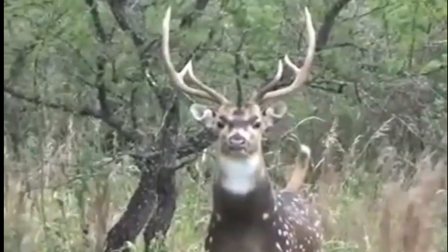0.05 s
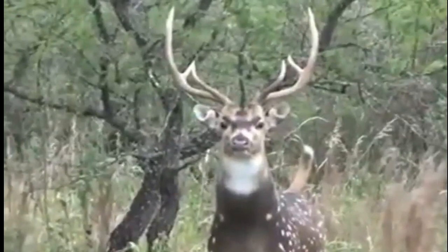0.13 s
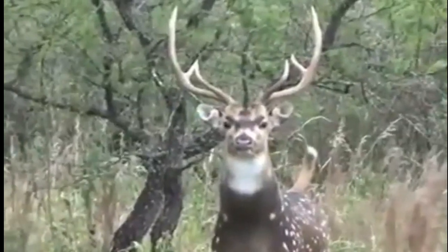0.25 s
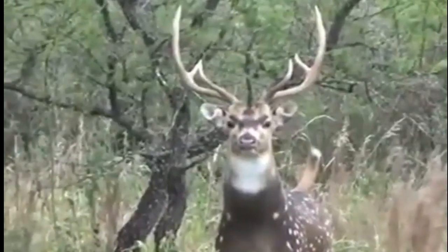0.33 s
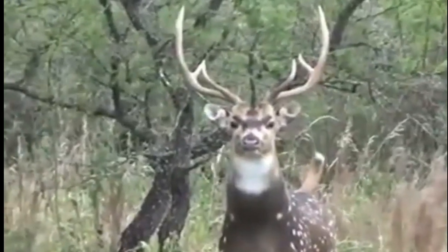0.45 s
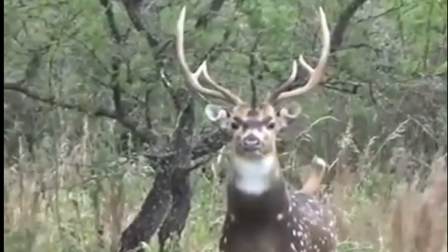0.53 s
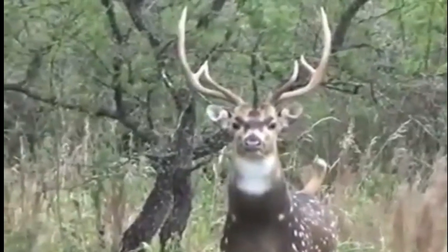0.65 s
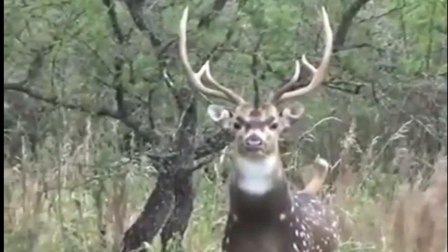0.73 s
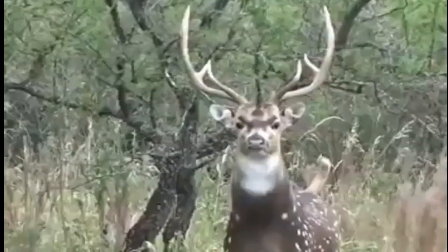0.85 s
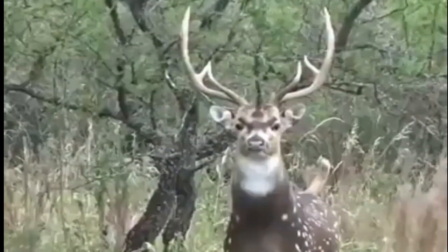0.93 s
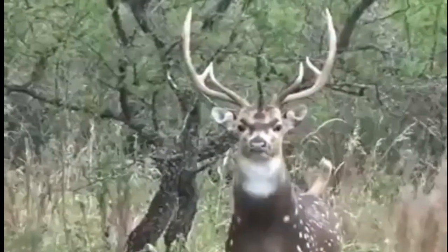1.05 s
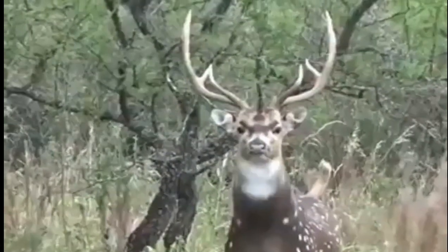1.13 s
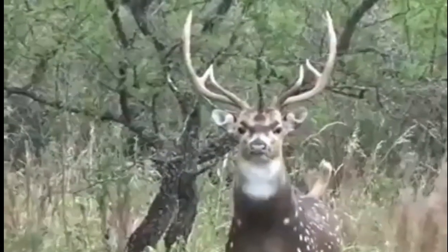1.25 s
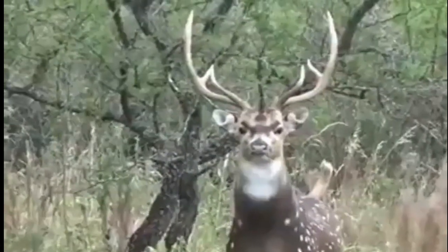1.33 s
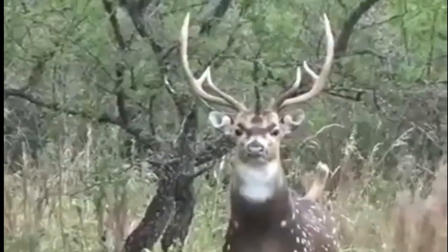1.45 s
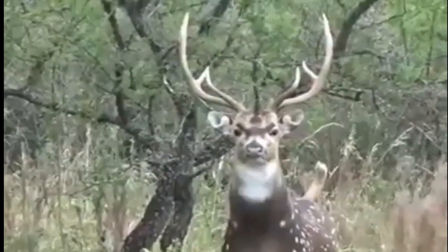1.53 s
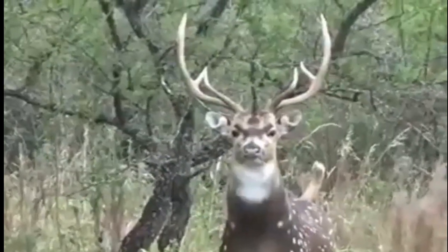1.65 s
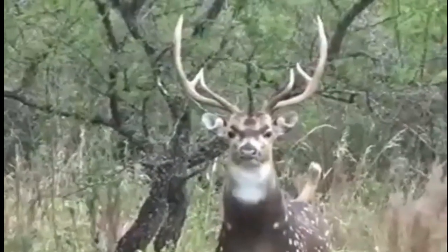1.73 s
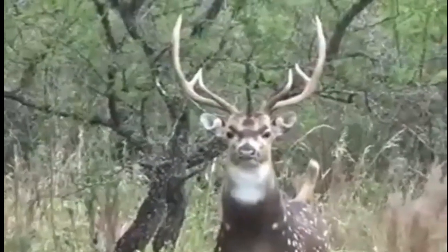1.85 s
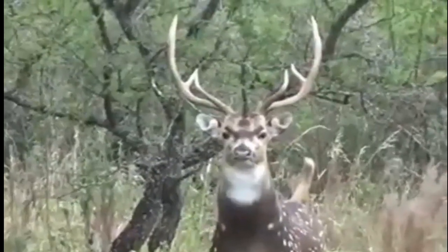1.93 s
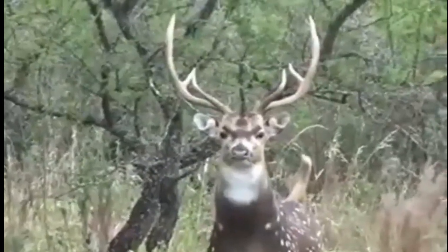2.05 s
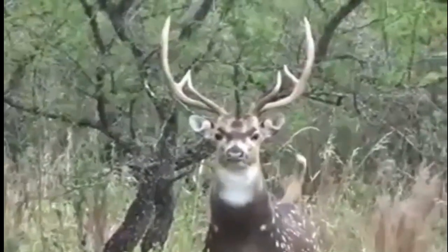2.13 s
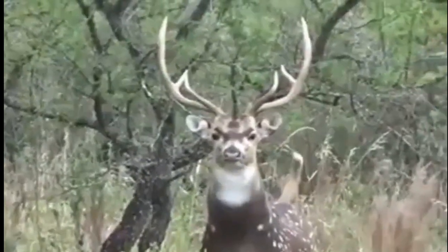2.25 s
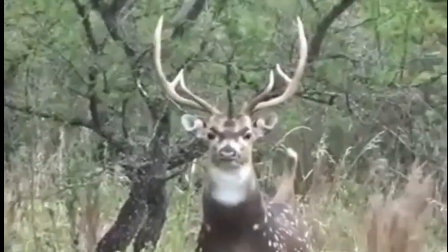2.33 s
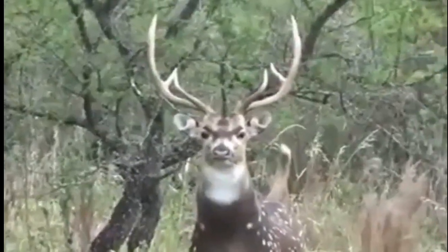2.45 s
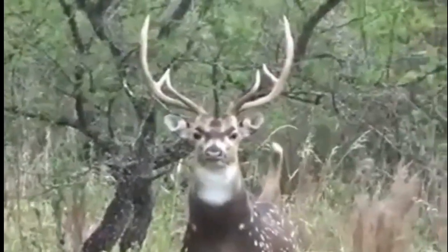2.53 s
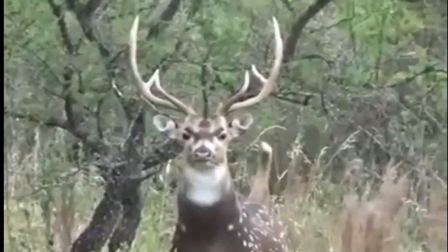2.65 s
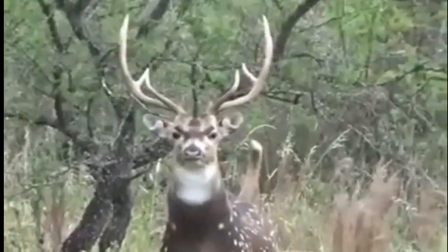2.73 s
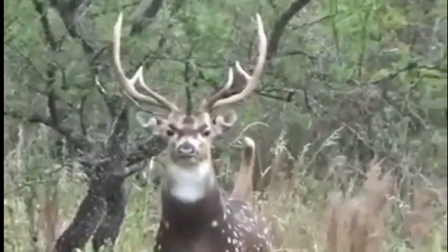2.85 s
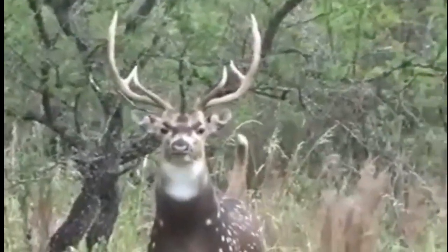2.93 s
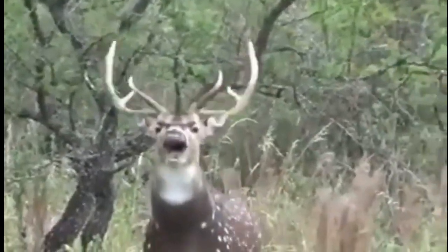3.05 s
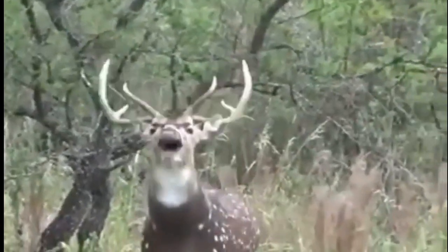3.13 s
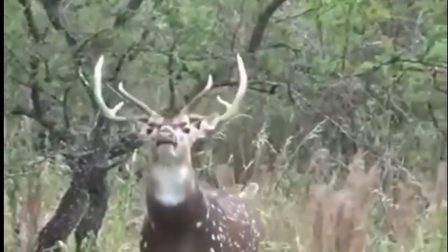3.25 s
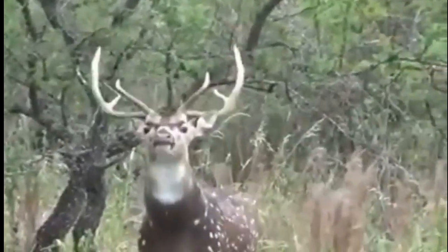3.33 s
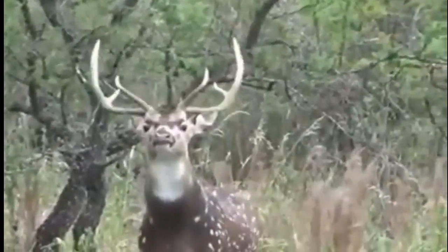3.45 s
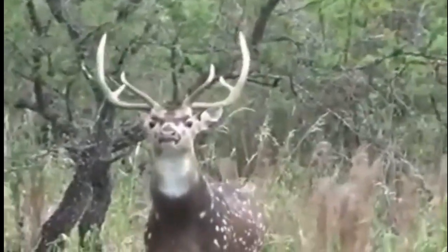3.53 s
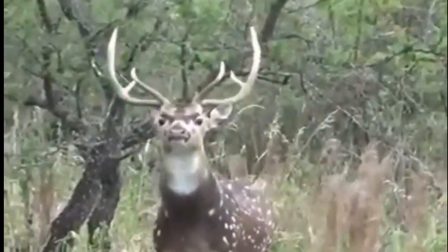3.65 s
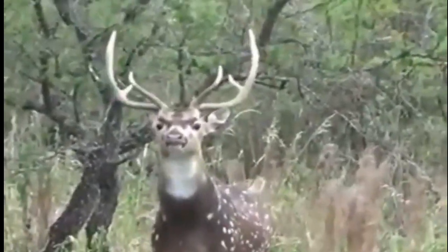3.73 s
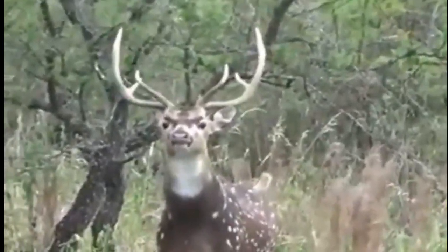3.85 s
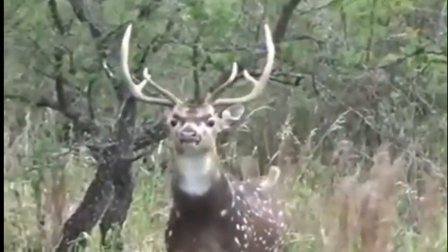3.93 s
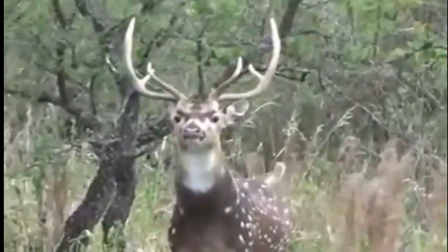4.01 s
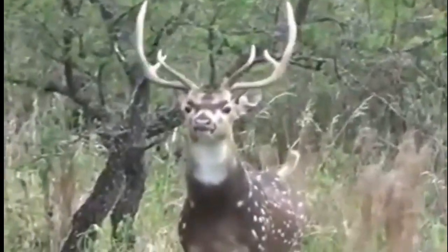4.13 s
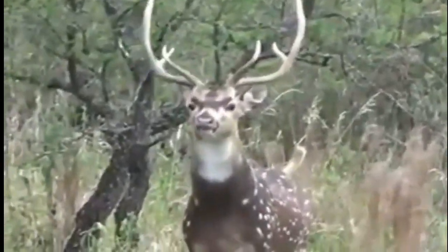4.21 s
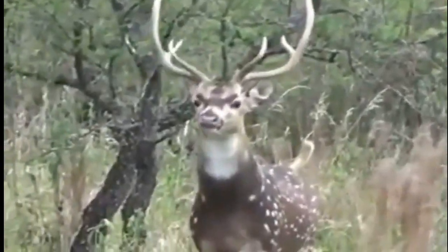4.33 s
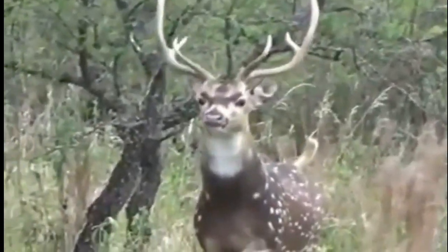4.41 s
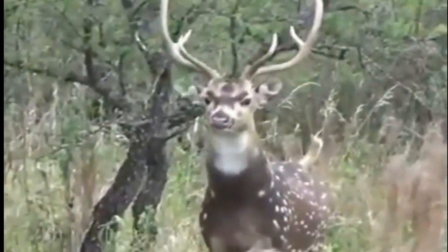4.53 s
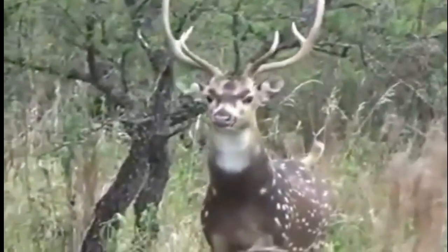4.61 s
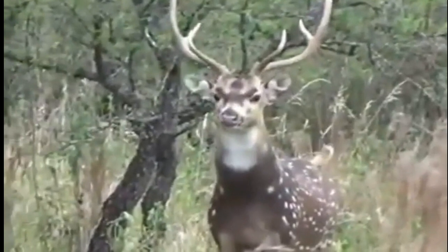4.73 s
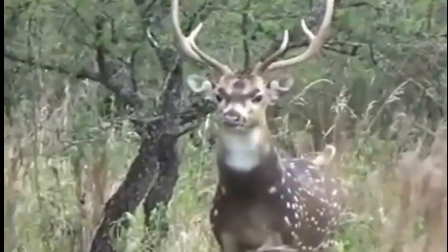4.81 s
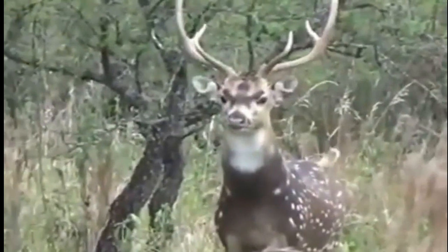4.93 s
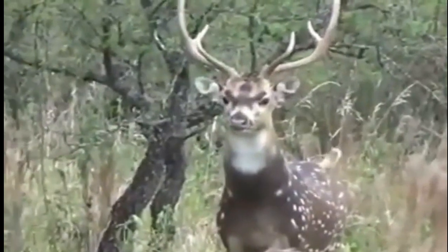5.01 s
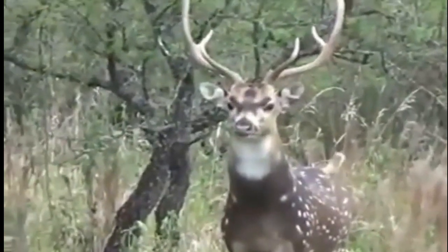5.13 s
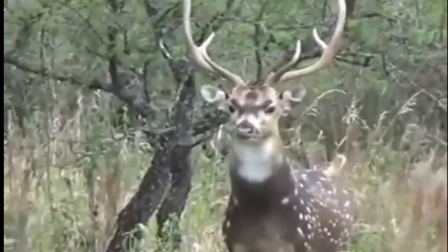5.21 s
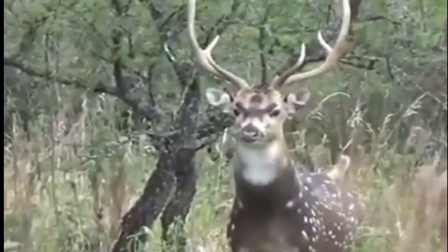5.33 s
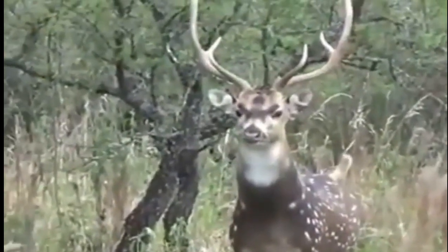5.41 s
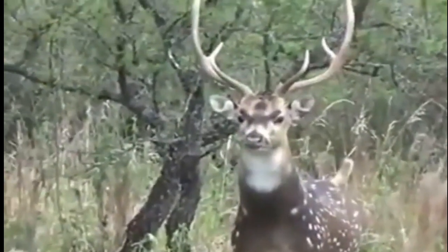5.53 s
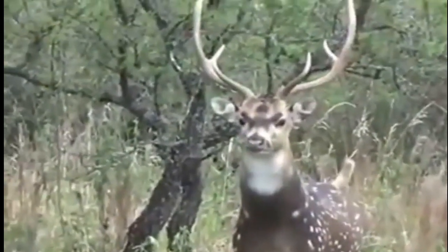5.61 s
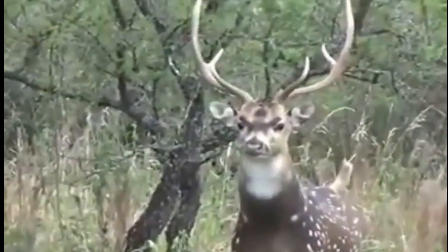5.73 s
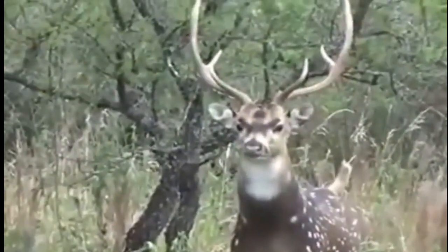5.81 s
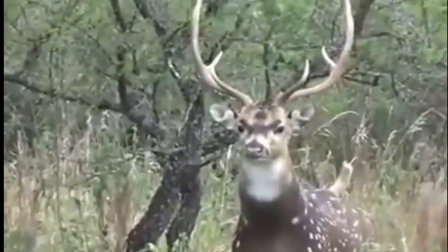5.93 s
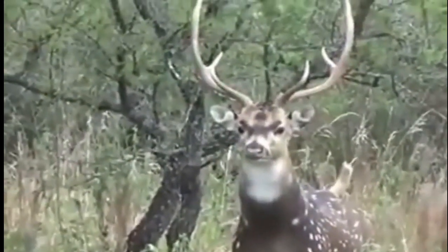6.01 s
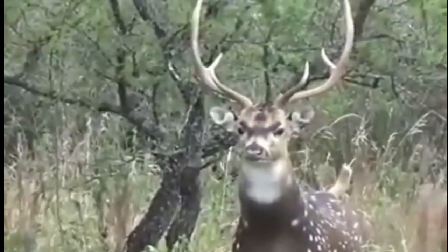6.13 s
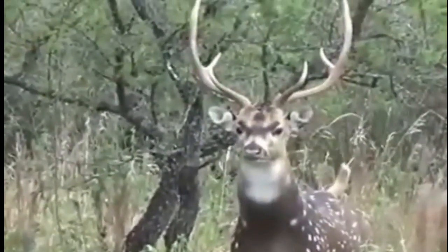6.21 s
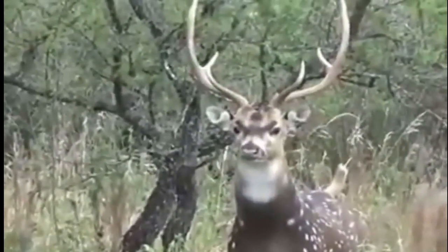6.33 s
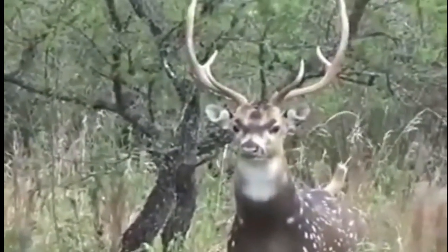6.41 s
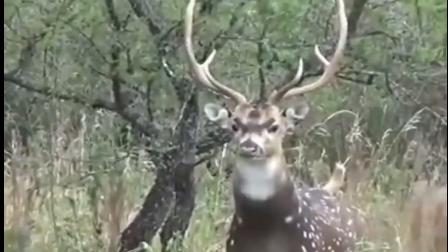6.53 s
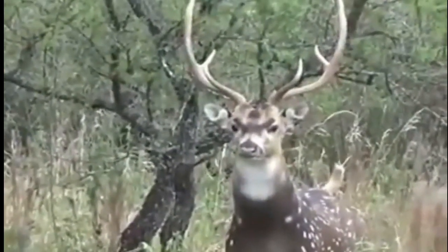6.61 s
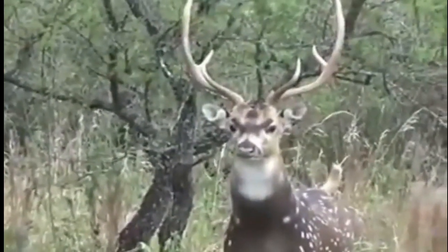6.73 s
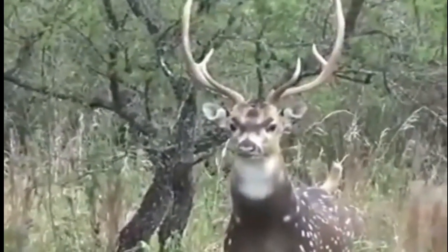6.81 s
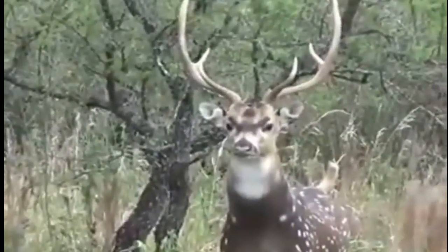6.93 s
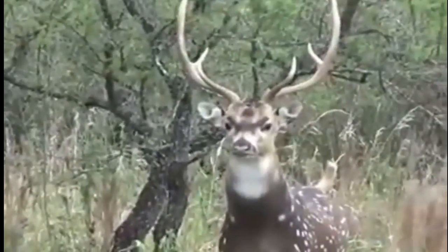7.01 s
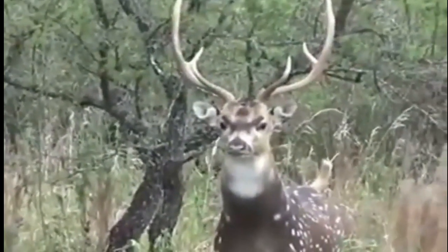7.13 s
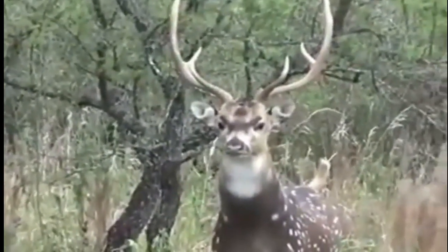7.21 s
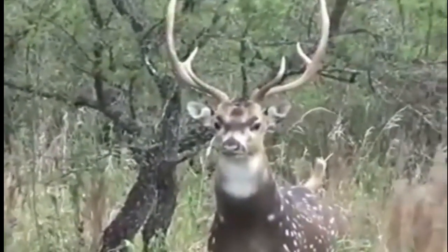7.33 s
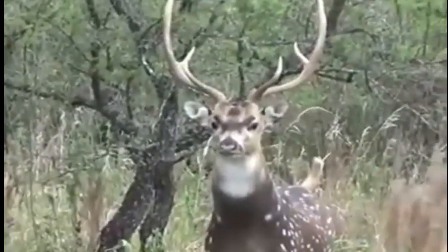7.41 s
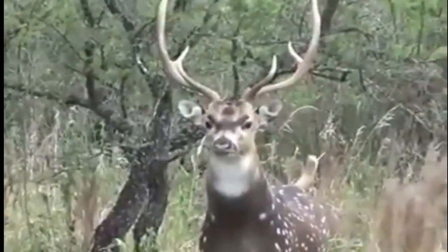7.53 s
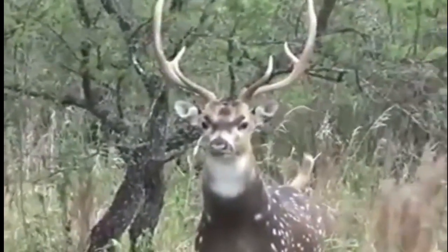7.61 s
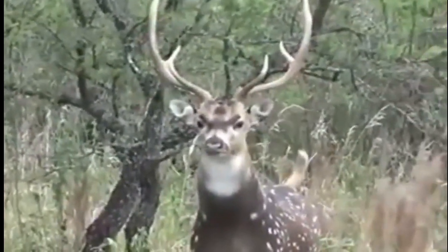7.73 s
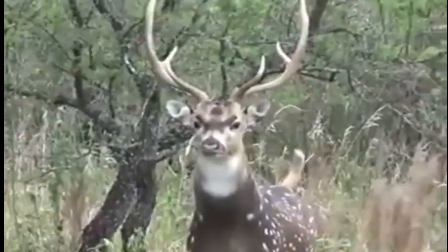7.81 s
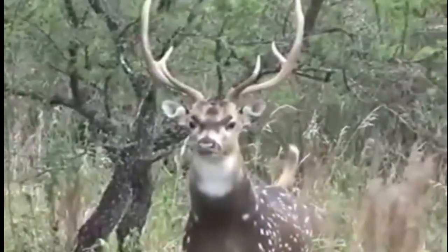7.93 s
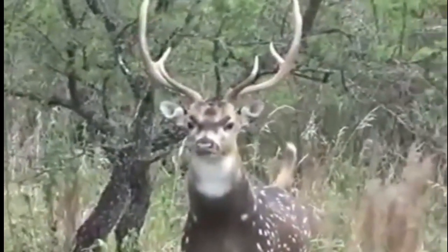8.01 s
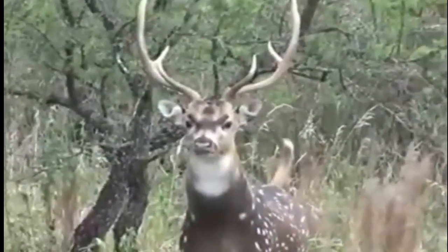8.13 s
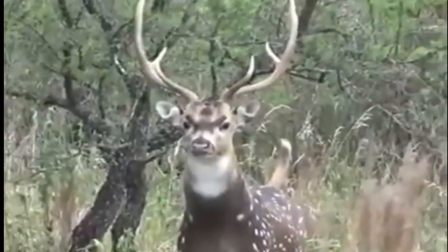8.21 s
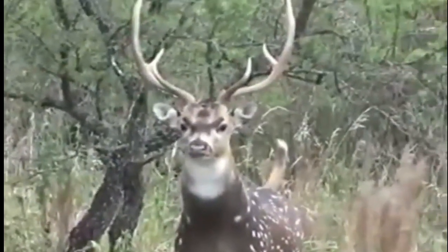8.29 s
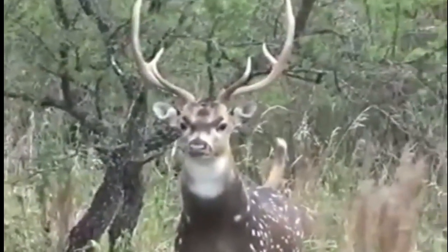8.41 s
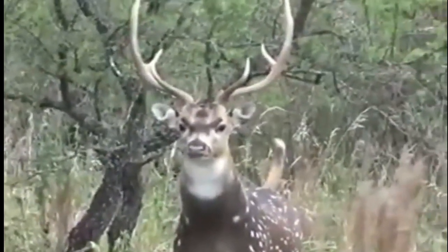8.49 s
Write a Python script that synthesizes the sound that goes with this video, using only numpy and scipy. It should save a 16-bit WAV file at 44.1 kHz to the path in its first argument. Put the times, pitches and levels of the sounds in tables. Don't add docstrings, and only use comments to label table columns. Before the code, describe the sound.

Deer give short, clean, high whistled barks at intervals, near and far, echoing through dry scrub over a steady pulsing cricket and faint birds.

```python
import sys
import numpy as np
from scipy import signal
from scipy.fft import rfft, irfft, next_fast_len
from scipy.io import wavfile
from scipy.ndimage import uniform_filter1d

SR = 44100
rng = np.random.default_rng(int(sys.argv[2]) if len(sys.argv) > 2 else 0)


def to_linear_factor(level_db):
    exponent = np.asarray(level_db, float) / 20
    return 10 ** exponent


def generate_wav(signal):
    frames = np.transpose(np.atleast_2d(signal))
    scaled = np.clip(frames, -1, 1) * 32767
    pcm = np.round(scaled).astype(np.int16)
    wavfile.write(sys.argv[1], SR, pcm)


N = 377496

# f/Hz, level/dB per Hz
AIR_COLOUR = [(25, -18), (60, -2.5), (240, -3.5), (660, -0.5), (950, -4.5), (1500, -10), (3300, -9.5),
              (4700, -14.5), (7000, -30), (7700, -21.5), (9500, -20), (11500, -21.5), (13500, -21.5)]
# f/Hz, likeness/0-1
AIR_LIKENESS = [(60, 0.98), (150, 1), (360, 0.063), (890, 0.28), (2200, 0.33), (5400, 0.95), (13300, 0.43)]
AIR_DB, AIR_TOP_HZ = -58, 13150
# t/s, level/dB
HUM_LEVEL = [(0, -71), (1.5, -68.5), (3, -71.5), (4.5, -76), (8.56, -78)]

# f/Hz, width/Hz, level/dB, throbs/per s, throb depth/dB
INSECT_BANDS = [
    (6363, 380, -59.5, 19, 1),
    (5437, 400, -61, 21, 0),
    (5590, 1500, -65, 18, 6.5),
    (6580, 460, -67.5, 15, -5.5),
]

# t/s, ring level/dB, ring f/Hz, crack level/dB, left over right/dB
TWIG_SNAPS = [(1.299, -52, 3530, -53, -10), (3.118, -42.5, 2570, -44, 1), (3.536, -33.5, 2470, -30.5, -4),
              (3.599, -45, 1512, -45, -8), (3.833, -41, 4200, -34, 4.5), (4.2998, -37, 802, -34.5, 4),
              (4.588, -31, 1820, -41, -4), (6.044, -31, 995, -34.5, 3), (8.24, -44, 4140, -57, -5),
              (1.138, -50.5, 2934, -53, 0), (5.708, -42, 2700, -48, 2), (2.872, -55, 3000, -56.5, -0.5)]

# t/s, length/s, turning f/Hz, drop to the end/Hz (negative dips), level/dB
ARCHED_WHISTLES = [(.53, 0.063, 3880, 898, -55.5), (4.103, 0.068, 3230, 31, -63),
                   (6.23, 0.028, 3690, 799, -60.5), (6.279, .06, 3190, 125, -56.5),
                   (6.428, 0.046, 3140, 205.5, -59), (6.514, .024, 3750, 798, -57.5),
                   (6.922, 0.051, 3730, 599.5, -61.5), (7.125, 0.031, 4415, 1200, -62),
                   (7.215, .085, 2537, -450, -65.5), (8.281, 0.066, 2480, -450, -66),
                   (8.336, 0.097, 3520, 898.5, -58), (6.832, .02, 3400, 899.5, -64),
                   (1.31, .022, 3700, 998, -61), (2.838, .02, 3290, 300.5, -63),
                   (4.036, .025, 3350, 100, -62)]
RISE_SHARE, TURN_SHARE, EDGE_DB = .7, 0.39, -4
# t/s, length/s, start f/Hz, end f/Hz, level/dB
STRAIGHT_WHISTLES = [(2.565, .035, 8850, 6870, -64), (7.44, .035, 4100, 3100, -67),
                     (7.83, .06, 4143, 2420, -65), (8.125, .045, 4450, 3020, -61),
                     (8.17, .04, 2980, 3430, -64), (.585, .035, 3050, 2550, -60),
                     (5.755, .035, 2050, 1600, -61), (5.995, .03, 1950, 1550, -61),
                     (8.25, .04, 4000, 2600, -65), (2.53, .03, 4600, 3900, -64),
                     (.14, .08, 1230, 1230, -62), (6.33, .025, 3000, 2400, -63), (0, .36, 430, 436, -63),
                     (3.62, .36, 374, 372, -66), (3.68, .3, 185, 182, -65), (8.08, .47, 460, 460, -69)]
# five t/s, their five f/Hz, level/dB
BENT_WHISTLES = [
    ((.258, .285, .315, .345, .362), (3150, 3800, 4050, 3800, 3030), -61),
    ((.755, .79, .85, .93, .97), (2700, 3000, 3140, 2960, 2750), -58.5),
    ((2.635, 2.65, 2.68, 2.705, 2.72), (2900, 3596, 3450, 3200, 2900), -64),
    ((2.998, 3.02, 3.045, 3.065, 3.08), (2900, 3350, 3400, 3100, 2500), -62),
    ((4.388, 4.398, 4.425, 4.465, 4.5), (3500, 2750, 2320, 2850, 3500), -62),
]
TRILL_S, TRILL_LENGTH_S, TRILL_DB = 6.572, .095, -56
TRILL_HZ, TRILL_SWING_HZ, TRILL_PER_S = 3280, 230, 75

# first t/s, last t/s
CRICKET_RUNS = [(.051, .51), (0.667, .949), (1.007, 1.299), (1.683, 2.707), (2.929, 3.318), (3.429, 3.596),
                (3.653, 4.397), (4.647, 5.211), (5.27, 5.503), (5.807, 6.495), (6.689, 7.204),
                (7.421, 7.763), (7.823, 8.229), (8.448, 8.506)]
LONE_PULSES = [0.013, 1.683, 3.596, 4.698, 7.146, 7.6475]
BEAT_S, PULSE_S, PAIR_S = .057, .0165, .0198
CRICKET_HZ, DROOP_HZ = 5722, 260
CRICKET_DB, BLUR_DB, CRICKET_LEFT_DB = -43.3, -35, 1.4

# f/Hz, time to fall 60 dB/s
ECHO_RING = [(500, 1.1), (850, 1.2), (1060, 2.0), (1500, 1.2), (1850, 1.2), (2150, 1.9), (4000, .7),
             (9000, .25)]
NEAR_DB, NEAR_T60 = 15, 0.43
# delay t/s, level/dB
EARLY_SLAPS = [
    (.017, -23.5),
    (.031, -28.5),
    (.052, -27),
]
# delay t/s, level/dB
SLOPE_RETURNS = [(.12, -30), (0.092, -28), (.2, -28.5), (.085, -28), (.2, -27), (.15, -22)]
ECHO_TILTS = [-0.5, -3, -4.5, -3, -2, -3.5]

# t/s, pitch f/Hz, effort level/dB, mouth opening (2nd harmonic over 1st)/dB
NEAR_BARKS = [
    [(1.651, 915, -52, -2.5), (1.67, 959.5, -27, 2), (1.68, 1006, -13, -4), (1.72, 1059, -14.5, -1.5),
     (1.78, 1082, -11, -3), (1.85, 1055, -13.5, -1), (1.895, 1002, -12, -5), (1.972, 774, -33, -2.5),
     (2.0, 649, -44, -35)],
    [(3.134, 824, -44, 2.5), (3.149, 937, -17.5, 8), (3.18, 1035, -13.5, -2), (3.22, 1045, -11.5, -5),
     (3.255, 1027, -10.5, -9.5), (3.29, 1023, -9.5, -10), (3.33, 912, -10.5, -4), (3.38, 679, -30, 2),
     (3.41, 523, -43.5, -21)],
    [(4.618, 860, -59.5, 5.5), (4.65, 973, -19, -9.5), (4.68, 1031, -9.5, -7.5), (4.72, 1075, -13, -3.5),
     (4.77, 1076, -13.5, -1), (4.83, 1048, -12.5, -4), (4.865, 962, -17.5, -5), (4.915, 770, -28, -3.5),
     (4.945, 623.4, -52, -10)],
]
FAR_BARKS = [
    [(0.482, 1206, -66, -17), (0.497, 1255, -47, -17), (0.56, 1284, -44.5, -19), (0.61, 1278, -45, -14),
     (0.65, 1209, -48, -24), (0.69, 1146, -55.5, -3), (0.72, 960, -58, -7), (0.74, 904, -81, -5)],
    [(5.447, 1147, -70, -2), (5.46, 1185, -34.5, -2), (5.478, 1210, -27.5, -10), (5.5, 1253, -31.5, -8.5),
     (5.555, 1246, -35, -3.5), (5.577, 1231, -36, -7), (5.6, 1138, -36.5, -10), (5.62, 1103, -67, 18.5)],
    [(7.485, 1021, -62, -16), (7.5, 1035, -32.5, -14), (7.53, 1040, -24.5, -12), (7.566, 999, -30, -12),
     (7.585, 980.3, -22, -7), (7.615, 938, -23.5, -9.5), (7.645, 882.7, -31.5, -14), (7.67, 771, -45, -0.5),
     (7.69, 683, -47, -7)],
]
# left over right/dB, echo level/dB, echo length/factor, unsteadiness/0-1, 2nd voice/dB
CALLERS = [
    (-0.5, -10.5, 0.73, 0.01, -61),
    (7, -21.5, 0.75, 0, -58),
    (1, -23, 0.73, 0, -59),
    (7, -21, 0.71, 0, -62),
    (2, -13, 0.88, 0.01, -3.5),
    (3, -16.5, 0.86, 0.01, -63),
]
# 3rd harmonic/dB, its loss/dB per 100 Hz under top pitch, breath/dB,
# 4th harmonic/dB, change for each higher harmonic/dB
VOICES = [(-40, 3, -21, -50, -5), (-27.5, 2.5, -30.5, -51.5, 1.5), (-32, 13, -21.5, -40.5, -3),
          (-26, 0.5, -31, -52, -2.5), (-16.5, 0, -22, -29, -4.5), (-21, 1, -24.5, -50, 4)]
MOUTH_HZ = [150, 400, 900, 1800, 3300, 5200, 6700, 8400, 10500, 13000]
MOUTHS = [(-32, -26.5, 5.5, 6.2, -3, -1, 15, -14, -13, -4),
          (3.5, -1.5, 6.1, 12, 4, 5.5, -4, 6, -11.5, -17.5), (-3, -7, 6.4, 2.4, 8.5, 0.5, -1, 5, 6.5, -8.5),
          (4, 2, 9.5, 8.9, 12, 2.5, -0.5, 5, -9, -17), (2.5, -10, 3, 7.5, 10, -17, 10, 7.5, -1.5, -14.5),
          (-4, -4, 14, 12, 21.5, -6.5, 1, -13, -12, -20)]
# harmonic number, start t/s, end t/s
SHINES = [(4, 1.68, 1.93), (5, 1.68, 1.72), (5, 1.765, 1.9), (7, 1.68, 1.81), (8, 1.68, 1.81),
          (9, 1.68, 1.725), (10, 1.725, 1.83), (8, 1.875, 1.925), (4, 3.138, 3.165), (4, 3.16, 3.27),
          (5, 3.15, 3.2), (5, 3.255, 3.345), (4, 4.645, 4.69), (4, 4.7, 4.86), (6, 4.645, 4.745),
          (7, 4.65, 4.77), (8, 4.665, 4.735), (9, 4.645, 4.69), (10, 4.7, 4.83), (12, 4.665, 4.73),
          (3, 3.14, 3.23), (3, 3.22, 3.308), (6, 3.16, 3.22)]
SHINE_LEVELS = [-34, -36, -30.5, -34, -33, -37, -41, -35, -19, -26.5, -33.5, -28, -31.5, -32, -27, -34.5,
                -33.5, -40, -47.5, -49.5, -17, -14, -36]
TOP_HARMONIC = 9
FLICKER_DB, UPPER_FADE_DB_PER_S = 1.5, 22.5
BREATH_LOSS_DB, END_SHAKE, END_SHIMMER_DB = 0, .003, 0.53
SECOND_HZ, SECOND_RISE_HZ_PER_S, SECOND_FROM_S = 83, 240, .039
JET_DB = 4

# start t/s, end t/s, start f/Hz, width/Hz, level/dB
RASPS = [(1.665, 1.695, 6600, 700, -43), (1.88, 1.967, 5580, 1190, -41), (3.15, 3.183, 7190, 900, -32),
         (4.639, 4.664, 6500, 1786, -37.5), (4.757, 4.84, 7940, 2500, -43), (4.809, 4.918, 5180, 600, -37),
         (1.8, 1.89, 8300, 2200, -44), (7.497, 7.582, 1800, 298, -39), (7.497, 7.572, 690, 236, -47),
         (0, 0.047, 7700, 600, -56)]
GASPS = [
    (5.605, 5.646, 1950, 130, -46.5),
    (5.605, 5.635, 1060, 150, -54),
]
# start t/s, end t/s, f/Hz, width/Hz,
# level/dB
HISSES = [(5.475, 5.495, 7350, 150, -56), (5.54, 5.585, 7220, 50, -56), (5.52, 5.59, 8530, 150, -55),
          (5.48, 5.61, 10000, 250, -58), (7.505, 7.625, 3350, 150, -39), (7.5, 7.63, 2880, 220, -44),
          (7.53, 7.62, 4900, 300, -57), (7.5, 7.6, 4050, 250, -53),
          (1.652, 1.678, 1650, 350, -38), (1.653, 1.675, 900, 150, -40.5), (1.685, 1.744, 500, 400, -47.5),
          (3.278, 3.297, 1600, 600, -33), (4.635, 4.66, 1400, 300, -48), (7.51, 7.559, 1500, 200, -48),
          (7.635, 7.69, 720, 150, -46), (5.5, 5.6, 1900, 300, -55)]
RASP_SAG, GASP_SAG, RASP_LEFT_DB = 0.064, 0.268, 1.5

BASS_MONO = .5


def evened(x):
    return x / np.sqrt(np.mean(x ** 2) + 1e-20)


def read(points, hz):
    f, value = np.transpose(points)
    return np.interp(np.log(hz + 1), np.log(f + 1), value)


def drift(count, size):
    return evened(uniform_filter1d(uniform_filter1d(rng.standard_normal(count), size), size))


def glide(s, hz):
    t = np.arange(s[0], s[-1], 1 / SR)
    k = np.clip(np.searchsorted(s, t, "right") - 1, 0, len(s) - 2)
    slope, step, rise = np.gradient(hz, s), np.diff(s)[k], np.diff(hz)[k]
    u = (t - s[k]) / step
    bend = (1 - u) * (slope[k] * step - rise) - u * (slope[k + 1] * step - rise)
    return t, np.interp(t, s, hz) + u * (1 - u) * bend


def swell(t, start, end):
    return np.sin(np.pi * np.clip((t - start) / (end - start), 0, 1)) ** 0.26


def add(mix, s, sound, pan_db=0):
    part = mix[:, max(round(s * SR), 0):][:, :np.shape(sound)[-1]]
    part += np.atleast_2d(sound)[:, :part.shape[1]] * to_linear_factor(np.array([[.5], [-.5]]) * pan_db)


def echoes(length=1, tilt_db=0):
    shape = (2, 3 * SR // 2)
    taps = rng.standard_normal(shape) * (rng.random(shape) < .05)
    taps += .5 * taps[::-1]
    hz, t, z = signal.stft(taps, SR, nperseg=256)
    t60 = read(ECHO_RING, hz)[:, None]
    slopes = to_linear_factor(-60 * t / length / t60)
    trunks = to_linear_factor(NEAR_DB - 60 * t / np.minimum(NEAR_T60, 1.1 * t60))
    decay = (slopes + trunks) * to_linear_factor(1.8 * drift(len(t), size=9)) * (1 - np.exp(-t / 0.004))
    decay *= to_linear_factor(tilt_db * np.log2(np.maximum(hz, 1000) / 1000))[:, None]
    tail = signal.istft(z * decay, SR, nperseg=256)[1]
    return tail / np.linalg.norm(tail[0])


def air():
    frames, hz = N // 256 + 5, np.fft.rfftfreq(1024, 1 / SR)
    a, b, c, d, patches = rng.standard_normal((frames, 513, 5)).T
    patches = evened(uniform_filter1d(uniform_filter1d(patches, 12, 0), 14, 1))
    same = np.clip(read(AIR_LIKENESS, hz), -1, 1)[:, None]
    left = a + 1j * b
    right = same * left + np.sqrt(1 - same ** 2) * (c + 1j * d)
    level_db = read(AIR_COLOUR, hz)[:, None] + 1.5 * patches + 0.45 * drift(frames, size=30)
    z = np.array([left, right]) * to_linear_factor(level_db) * (hz < AIR_TOP_HZ)[:, None]
    wash = to_linear_factor(AIR_DB) * evened(signal.istft(z, nperseg=1024, noverlap=768)[1][:, :N])
    t = np.arange(N) / SR
    hum = np.sin(2 * np.pi * 93 * t + .6 * drift(N, size=3000)) * (1 + .3 * drift(N, size=4000))
    return wash + to_linear_factor(np.interp(t, *np.transpose(HUM_LEVEL)) + 0.5) * hum


def chorus():
    size = next_fast_len(N)
    hz, out = np.fft.rfftfreq(size, 1 / SR), 0
    for centre_hz, width, db, rate, depth_db in INSECT_BANDS:
        noise = rng.standard_normal((2, N))
        shape = 1 / (1 + (2 * (hz - centre_hz) / width) ** 4)
        band = irfft(rfft(noise + 0.17 * noise[::-1], size) * shape, size)[:, :N]
        throb = np.cos(2 * np.pi * np.cumsum(rate * (1 + 0.036 * drift(N, size=20000))) / SR)
        out = out + to_linear_factor(db + depth_db * throb + 0.69 * drift(N, size=15000)) * evened(band)
    return out


def twigs():
    out, t = np.zeros((2, N)), np.arange(1500) / SR
    crack_filter = signal.butter(1, [800 / SR * 2, 3000 / SR * 2], "band")
    for s, ring_db, hz, crack_db, pan_db in TWIG_SNAPS:
        noise = rng.standard_normal((2, 1500))
        ring = np.sin(2 * np.pi * hz * t) * to_linear_factor(ring_db - 60 * t / 0.019)
        splinters = (noise + noise[::-1] / 2) * to_linear_factor(crack_db - 60 * t / 0.07)
        crack = signal.lfilter(*crack_filter, splinters)
        add(out, s, (ring + crack) * np.minimum(t / 0.0002, 1), pan_db)
    return out


def trill():
    t = np.arange(0, TRILL_LENGTH_S, 1 / SR)
    warble = np.sin(2 * np.pi * TRILL_PER_S * t) * (1 + 0.41 * drift(len(t), size=200))
    hz = TRILL_HZ + TRILL_SWING_HZ * warble
    return to_linear_factor(TRILL_DB) * np.sin(2 * np.pi * np.cumsum(hz) / SR) * np.hanning(len(t)) ** 0.11


def birds():
    out = np.zeros((2, N))
    arches = [(s, length, (hz - RISE_SHARE * drop, hz, hz - drop), db)
              for s, length, hz, drop, db in ARCHED_WHISTLES]
    slides = [(s, length, (a, a + TURN_SHARE * (b - a), b), db)
              for s, length, a, b, db in STRAIGHT_WHISTLES]
    notes = [(start + length * np.array([0, TURN_SHARE, 1]), hz, db)
             for start, length, hz, db in arches + slides]
    for s, hz, db in notes + BENT_WHISTLES:
        t, hz = glide(np.array(s), np.array(hz))
        shaky_hz = hz * (1 + 0.0063 * drift(len(t), size=100))
        husk = 1 + 0.35 * drift(len(t), size=160)
        tone = np.sin(2 * np.pi * np.cumsum(shaky_hz) / SR) * husk
        level = to_linear_factor(db + np.interp(t, [s[0], s[len(s) // 2], s[-1]], [EDGE_DB, 0, EDGE_DB]))
        add(out, s[0], np.sqrt(2) * level * tone * signal.windows.tukey(len(t), .15), 2.5)
    add(out, TRILL_S, trill(), 2.5)
    return out + to_linear_factor(-13.0) * signal.fftconvolve(out, echoes(), axes=1)[:, :N]


def pulse_pairs():
    beats = np.concatenate([np.linspace(a, b, round((b - a) / BEAT_S) + 1) for a, b in CRICKET_RUNS])
    return beats[abs(beats[:, None] - LONE_PULSES).min(axis=1) > BEAT_S / 4]


def cricket():
    out, u = np.zeros((2, N)), np.arange(round(PULSE_S * SR)) / (PULSE_S * SR)
    strokes = np.concatenate([pulse_pairs(), pulse_pairs() + PAIR_S, LONE_PULSES])
    for s, luck in zip(strokes, rng.standard_normal((len(strokes), 3))):
        hz = CRICKET_HZ + 15 * luck[0] - 1.6 * DROOP_HZ * abs(u - .35) ** 3.9
        phase = 2 * np.pi * (np.cumsum(hz) / SR + luck[1])
        stroke = np.sin(np.pi * u) ** 1.4 * (np.sin(phase) + to_linear_factor(-30) * np.sin(2 * phase))
        add(out, s - PULSE_S / 2, to_linear_factor(CRICKET_DB + 0.38 * luck[2]) * stroke, CRICKET_LEFT_DB)
    blur = rng.standard_normal((2, 2000)) * to_linear_factor(-60 * np.arange(2000) / SR / 0.11)
    return out + to_linear_factor(BLUR_DB) * signal.oaconvolve(out, blur, axes=1)[:, :N]


def rasp(start, end, start_hz, end_hz, width, db):
    t = np.arange(start, end, 1 / SR)
    noise = rng.standard_normal((2, 2, len(t)))
    noise = signal.lfilter(*signal.butter(2, width / SR), noise + .6 * noise[:, ::-1])
    turn = np.exp(2j * np.pi * np.cumsum(np.linspace(start_hz, end_hz, len(t))) / SR)
    return to_linear_factor(db) * swell(t, start, end) * evened(((noise[0] + 1j * noise[1]) * turn).real)


def hoarseness():
    out = np.zeros((2, N))
    for rows, sag in ((RASPS, RASP_SAG), (GASPS, GASP_SAG), (HISSES, 0)):
        for start, end, hz, width, db in rows:
            add(out, start, rasp(start, end, hz, hz * (1 - sag), width, db), RASP_LEFT_DB)
    return out + to_linear_factor(-16.0) * signal.fftconvolve(out, echoes(), axes=1)[:, :N]


def breath_puffs(turns, mouth):
    count = len(turns)
    own, shared = rng.standard_normal((2, count)), rng.standard_normal(count)
    puffs = (1 + 0.45 * np.cos(2 * np.pi * turns)) * (0.81 * own + 0.86 * shared)
    colour = read(mouth, np.fft.rfftfreq(count, 1 / SR))
    z = signal.stft(irfft(rfft(puffs) * to_linear_factor(colour), count), nperseg=256)[2]
    patches = uniform_filter1d(uniform_filter1d(rng.standard_normal(z.shape[1:]), 3, 0), 16, 1)
    bass_steady = np.minimum(np.arange(len(patches)) / 8, 1)[:, None]
    return signal.istft(z * to_linear_factor(JET_DB * evened(patches) * bass_steady), nperseg=256)[1][:, :count]


def bark(rows, mouth_db, voice_db, unsteady, second_db):
    s, hz, effort_db, open_db = np.transpose(rows)
    third_db, loss_db, breath_db, upper_db, tilt_db = voice_db
    mouth = list(zip(MOUTH_HZ, mouth_db))
    t, hz = glide(s, hz)
    count, age = len(t), t - s[0] - SECOND_FROM_S
    away = (hz.max() - hz) / 100
    loss = loss_db * away * (t > t[hz.argmax()])

    push_db = np.interp(t, s, effort_db)
    effort = to_linear_factor(push_db + END_SHIMMER_DB * away * drift(count, size=110))
    breath = to_linear_factor(push_db + breath_db - BREATH_LOSS_DB * away + 1.5 * drift(count, size=600))
    turns = np.cumsum(hz * (1 + (unsteady + END_SHAKE * away) * drift(count, size=90))) / SR
    second = to_linear_factor(second_db) * np.clip(age / .012 + .7, 0, 1)
    other = turns + (SECOND_HZ + SECOND_RISE_HZ_PER_S * age / 2) * age + .5

    over_db = [0, np.interp(t, s, open_db), third_db - loss + 2.5 * drift(count, size=900)]
    for k in range(4, TOP_HARMONIC + 1):
        fade_db = (tilt_db - UPPER_FADE_DB_PER_S * age) * (k - 4)
        flicker_db = FLICKER_DB * drift(count, size=1200)
        over_db.append(upper_db + fade_db - loss + read(mouth, k * hz) + flicker_db)

    voice = 0
    for k, db in enumerate(over_db, 1):
        main = np.cos(2 * np.pi * k * turns + .8 * k * k / 2)
        extra = to_linear_factor(-1.5 * (k - 1) ** 2) * np.cos(2 * np.pi * k * other)
        if k == 3:
            extra = extra + 0.68 * np.cos(2 * np.pi * (2 * turns + other))
        voice = voice + to_linear_factor(db) * (main + second * extra)
    for (k, start, end), db in zip(SHINES, SHINE_LEVELS):
        if s[0] < start < s[-1]:
            shine = to_linear_factor(db + 2.6 * drift(count, size=500)) * swell(t, start, end)
            voice = voice + shine * np.cos(2 * np.pi * k * turns)
    return np.sqrt(2) * effort * voice + breath * breath_puffs(turns, mouth)


def deer():
    out = np.zeros((2, N))
    barks = sorted(NEAR_BARKS + FAR_BARKS)
    for rows, mouth_db, voice_db, tilt_db, (late, late_db), caller in zip(
            barks, MOUTHS, VOICES, ECHO_TILTS, SLOPE_RETURNS, CALLERS):
        pan_db, echo_db, length, unsteady, second_db = caller
        start = rows[0][0]
        call = bark(rows, mouth_db, voice_db, unsteady, second_db)
        add(out, start, call, pan_db)
        tail = signal.fftconvolve(call, echoes(length, tilt_db), axes=1)
        add(out, start, to_linear_factor(echo_db) * tail, 0.35 * pan_db)
        add(out, start + late, to_linear_factor(late_db) * uniform_filter1d(call, size=18))
        for delay, db in EARLY_SLAPS:
            add(out, start + delay, to_linear_factor(db) * call, rng.uniform(-5.5, 3))
    return out + hoarseness()


def scene():
    return air() + chorus() + twigs() + birds() + cricket() + deer()


def band_limit(x):
    return signal.sosfilt(signal.butter(12, 13880, fs=SR, output="sos"), x)


def record(dry):
    power_db = 10 * np.log10(abs(uniform_filter1d((dry ** 2).mean(0), 400)) + 1e-12)
    creep = np.arange(N) * 14.0 / SR
    over_db = np.maximum(np.maximum.accumulate(power_db + creep) - creep + 23.5, 0)
    level = dry / to_linear_factor(0.19 * uniform_filter1d(over_db, 200))
    level = signal.oaconvolve(level, signal.firwin(301, 13700, fs=SR)[None], "same")
    mix = level - BASS_MONO * uniform_filter1d(level - level[::-1], size=180) / 2
    return band_limit(mix)


dry = scene()
out = record(dry)
generate_wav(out)
```